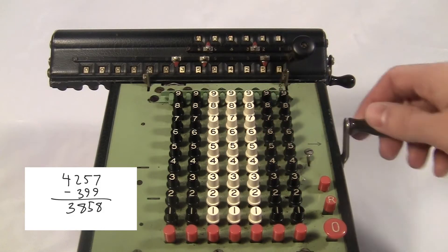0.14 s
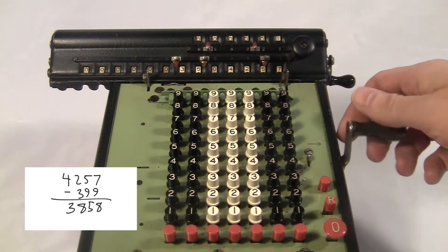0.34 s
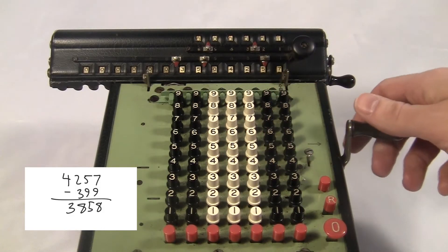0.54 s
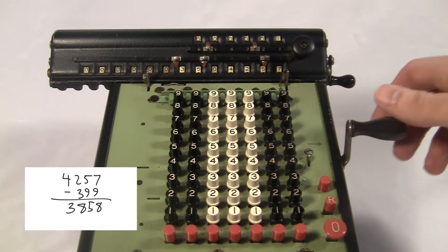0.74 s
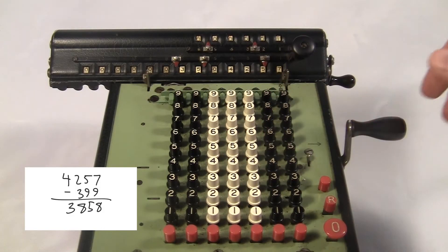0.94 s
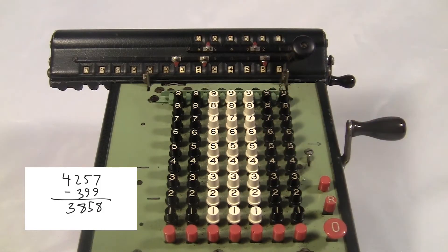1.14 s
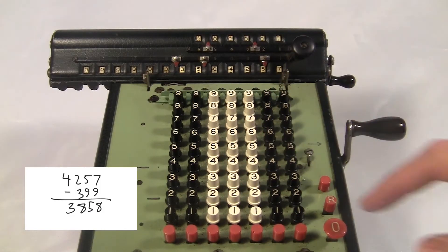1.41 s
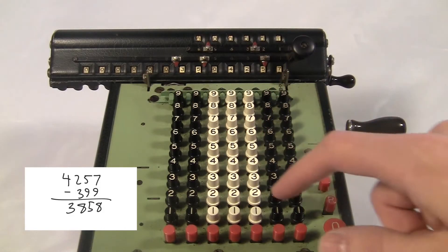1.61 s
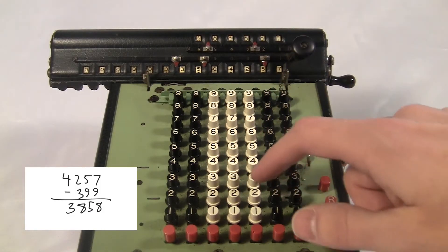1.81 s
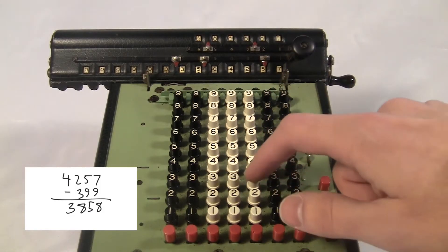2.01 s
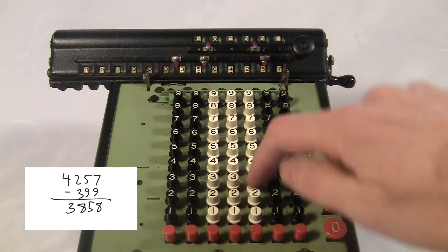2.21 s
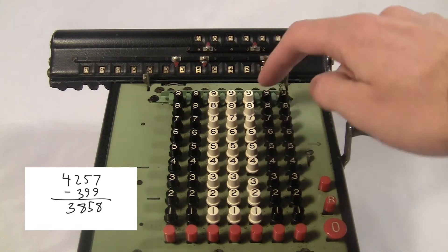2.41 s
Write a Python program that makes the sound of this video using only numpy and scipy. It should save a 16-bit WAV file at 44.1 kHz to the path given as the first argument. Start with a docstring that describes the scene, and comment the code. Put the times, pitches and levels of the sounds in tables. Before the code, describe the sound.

Metal clicks and a knock from a mechanical calculator's crank, followed by a sharp key press.

```python
"""A hand-cranked adding machine on a table in a small, quiet room, heard from close by.
First the crank swings back: metal slides, levers tick, and it knocks against its stop. Then the
mechanism drops home and latches. Each hit is a short burst of noise plus the ringing of steel parts.
After about a second come a faint rustle of the hand and two soft bumps. At about two seconds a finger
touches a key and presses it with a sharp snap, and last a small catch drops in behind it."""
import sys
import numpy as np
from scipy import signal
from scipy.fft import rfft, irfft
from scipy.io import wavfile
from scipy.ndimage import uniform_filter1d

SR = 44100
rng = np.random.default_rng(int(sys.argv[2]) if len(sys.argv) > 2 else 0)


def persist_wave(psi):
    """Save psi, clipped to +-1, as 16-bit WAV."""
    counts = np.round(np.clip(psi, -1, 1) * 32767).astype(np.int16)
    wavfile.write(sys.argv[1], SR, np.atleast_2d(counts).T)


N = 112454
BLOCK = 32768  # samples in one hit, filter or echo


def from_db(db):
    """Turn decibels into a number to multiply by."""
    return 10 ** (np.asarray(db) / 20)


def at_hz(points, hz):
    """Read between the rows of a table, giving every octave equal space."""
    row_hz, values = np.transpose(points)
    return np.interp(np.log(np.maximum(hz, 1)), np.log(row_hz), values)


def loudness_curve(points):
    """Join rows of seconds and dB into a gain for every sample."""
    return from_db(np.interp(np.arange(N) / SR, *np.transpose(points)))


def unit_energy(x):
    """Scale a sound so that its squared samples add up to one."""
    return x / np.sqrt(np.sum(x ** 2))


def fade(fade_s):
    """A smooth dying away; a fade time is how long it takes to drop 60 dB."""
    return np.exp(-np.log(1000) * np.arange(BLOCK) / SR / fade_s)


def causal_filter(gain):
    """A filter with these gains that never sounds ahead of its input (minimum phase)."""
    cepstrum = irfft(np.log(gain))
    cepstrum[1:BLOCK // 2] *= 2
    cepstrum[BLOCK // 2 + 1:] = 0
    return np.exp(rfft(cepstrum))


def with_tone(x, points):
    """Make some frequencies louder and others softer, following rows of Hz and dB."""
    gain = from_db(at_hz(points, np.fft.rfftfreq(BLOCK, 1 / SR)))
    return signal.fftconvolve(x, irfft(causal_filter(gain)))[:N]


def low_cut(x, hz):
    """Take away what lies below a frequency."""
    return signal.sosfilt(signal.butter(N=4, Wn=hz, btype="high", fs=SR, output="sos"), x)


def stereo(mid, side):
    """Make left and right from what they share (mid) and what sets them apart (side)."""
    return np.array([mid + side, mid - side])


# The tone of the room's background. Each row: frequency in Hz, relative level in dB.
AIR_TONE = [(25, -0.5), (53, 4.5), (169, -7), (221, 2.5), (389, -9), (567, -9), (871, -16.5), (1170, -20),
            (1490, -21.5), (2420, -27), (9300, -37.5), (15500, -47)]
# How much it differs between left and right. Each row: frequency in Hz, side level in dB.
AIR_WIDTH = [(60, -15), (150, -14.5), (380, -5), (950, 0), (2380, -1), (5980, -1.5), (15000, 0.5)]


def room_noise():
    """A steady low rush with a little hiss, there from start to end."""
    gain = from_db(at_hz(AIR_TONE, np.fft.rfftfreq(N, 1 / SR)))
    rushes = irfft(rfft(rng.standard_normal((2, N))) * gain, N)
    mid, side = (unit_energy(rush) * np.sqrt(N) for rush in rushes)
    return from_db(-51) * stereo(mid, with_tone(side, AIR_WIDTH))


# The tone the machine's body gives to slides, hits and bumps. Each row: frequency in Hz, gain in dB.
BODY_TONE = [(50, -7.5), (135, -4.5), (190, -7.5), (290, 1.5), (600, -1), (740, -8), (930, -2.5),
             (1180, -3), (1500, 0.5), (1980, -1), (2350, -1), (3400, -2), (4700, -1), (5700, -6),
             (7500, 0.5), (10500, -2.5), (12000, -15.5), (13500, -37), (15500, -50.5)]
# The cams and levers sliding, and later the key stem. Each row: time in seconds, level in dB.
SLIDING_LEVELS = [(0, -42.5), (.055, -51), (.11, -49.5), (.14, -40.5), (.175, -42.5), (.21, -32.5),
                  (0.227, -34.5), (.25, -46), (.33, -60), (.38, -42.5), (0.412, -55), (0.423, -37),
                  (.445, -44), (.48, -52), (.56, -70.5), (.62, -100), (2.151, -87), (2.192, -58),
                  (2.221, -36), (2.234, -40.5), (2.28, -52.5), (2.4, -85)]
# The gritty tone of sliding. Each row: frequency in Hz, relative level in dB.
SLIDING_TONE = [(100, -12), (400, 6), (800, 18), (1500, 8), (3500, 3.5), (9000, -2.5)]


def sliding():
    """Metal sliding on metal: many tiny snags, heard through the body."""
    snags_per_s, spread_db = 1500, 2
    snags = (rng.random(N) < snags_per_s / SR) * rng.choice([-1, 1], N)
    sizes = from_db(spread_db * np.minimum(rng.exponential(1, N), 4))
    grit = with_tone(with_tone(snags * sizes, BODY_TONE), SLIDING_TONE)
    return loudness_curve(SLIDING_LEVELS) * unit_energy(grit) * np.sqrt(N)


def hit_spectrum(strength_db, crack_fade_s):
    """The frequencies in one metal hit: a click, a brief crack and the clatter of loose parts."""
    crack, clatter = rng.standard_normal((2, BLOCK))
    rise_s = 0.00044 * from_db(-strength_db)  # light hits scrape in, hard ones start at once
    swell = 1 - np.exp(-np.arange(BLOCK) / SR / rise_s)
    clatter_db = -0.42 * strength_db  # light hits chatter more, hard ones are cleaner
    burst = from_db(-1) * unit_energy(crack * swell * fade(crack_fade_s))
    burst += from_db(clatter_db) * unit_energy(clatter * swell * fade(0.053))
    burst[0] += from_db(-19.5 - 0.01 * strength_db)  # the click
    spectrum = rfft(burst)
    broad_tone = np.sqrt(uniform_filter1d(abs(spectrum) ** 2, size=200))
    return spectrum / causal_filter(broad_tone)  # evens out bass and treble


def ring(hz, fade_s, looseness):
    """One fading note of struck steel; loose parts make its pitch wander."""
    wander = np.sqrt(2 * np.pi * hz * looseness / SR) * np.cumsum(rng.standard_normal(BLOCK))
    return unit_energy(np.cos(2 * np.pi * hz * np.arange(BLOCK) / SR + wander) * fade(fade_s))


# The five bands that set a hit's tone. Each entry is a frequency in Hz: thump, low, middle, upper, treble.
BANDS_HZ = [140, 450, 1200, 3500, 9000]


def strike(hits, notes, looseness, burst_db, crack_fade_s):
    """Each hit makes a burst of noise and rings the part's notes. Gives two tracks: bursts, ringing."""
    tracks = np.zeros((2, N + BLOCK))
    hz = np.fft.rfftfreq(BLOCK, 1 / SR)
    rings = np.array([from_db(db) * ring(pitch, fade_s, looseness) for pitch, db, fade_s in notes])
    body_db = at_hz(BODY_TONE, hz)
    for start_s, *band_db in hits:
        hit_db = at_hz(list(zip(BANDS_HZ, band_db)), hz)
        tone = causal_filter(from_db(body_db + hit_db))
        note_gains = from_db(2.5 * rng.standard_normal(len(notes)))  # no two hits ring alike
        ringing = rfft(note_gains @ rings)
        burst = hit_spectrum(max(band_db), crack_fade_s) * from_db(burst_db)
        start = int(start_s * SR)
        tracks[:, start:start + BLOCK] += irfft(np.array([burst, ringing]) * tone)
    return tracks[:, :N]


# The levers' hits. Each row: start in seconds, then thump, low, middle, upper and treble levels in dB.
LEVER_HITS = [(.003, 9, -1, -6, -13, -7), (.0185, -29, 3, 1.5, -6.5, -5.5), (.0255, -1, 7, -25, -33, -8),
              (.034, -6, 4, -10, -11, -10), (.0655, 3, -3, -8, -11.5, -9),
              (.0875, -8, -0.5, -4, -12, -10.5), (.094, -23, 4.5, -4, -17, -16),
              (.1168, -23, -18, -7, -4, 0), (.1208, -33, -22, -41, -8.5, 1), (.1505, 7.5, 9.5, 14, -5, -3),
              (.1847, -19, -15, -18, -11, -1.5), (.194, -2, 8, 4.5, -17.5, -7), (.2015, 4, 1, -10, -22, -3),
              (.2155, -12.5, 10, 4, 3, -1), (.2232, 13.5, 4.5, 6.5, 10.5, 1.5),
              (.2295, -2.5, 9, 15.5, -11, -29), (.369, -10, -8, -17, -21, -29),
              (.382, 0, -7, -6.5, -15.5, -10), (.3953, -13, -4, -6, -3.5, -22.5),
              (.4165, -6, -18, -3, -6, -17), (.4205, -22, -1, -3, -2, 8), (.4255, 1.5, -3.5, 2, -1, 1.5),
              (.4332, -34, -1.5, 0.5, 7, -8), (.4368, 4, 9.5, 11, -0.5, -15),
              (.4425, -5, -1, -2.5, -11, -6.5), (.5025, -12.5, -7, -18, -19, -14)]
# The notes of the steel case and levers. Each row: pitch in Hz, level in dB, fade time in seconds.
CASE_NOTES = [(142.3, -21.5, 0.26), (283, -21.5, 0.52), (400, -16.5, .06), (586, -27, 0.079),
              (950, -23, 0.14), (1267, -18, 0.13), (1422, -15.5, 0.047), (1772, -28, 0.23),
              (2398, -18, 0.033), (2813, -21.5, 0.048), (3390, -29.5, 0.31), (7580, -16, 0.024)]


def crank_levers():
    """Levers tick as the crank swings back, then drop home and latch, ringing the case."""
    return strike(LEVER_HITS, CASE_NOTES, looseness=0.015, burst_db=-1.5, crack_fade_s=0.018)


# Knocks on the stop. Each row: start in seconds, then thump, low, middle, upper and treble levels in dB.
STOP_HITS = [(.1245, -0.5, 11, 22, -4, -7), (.1265, 4, 14, 27, 6.5, -0.5), (.1279, 11, 11, 21.4, 9.5, 4.5),
             (.1413, 13, 7, 7, 5, -7)]
# The notes of the stop and its frame. Each row: pitch in Hz, level in dB, fade time in seconds.
STOP_NOTES = [(149, -15, .3), (632, -15.5, .022), (671, -29.5, 0.15), (886, -14.5, 0.15),
              (930, -13.5, 0.04), (1020, -35.5, .09), (1524, -18, .024), (1787, -26.5, .12),
              (2310, -20, .015)]


def crank_stop():
    """The crank knocks against its stop and bounces, ringing the frame."""
    return strike(STOP_HITS, STOP_NOTES, looseness=0.004, burst_db=-1.5, crack_fade_s=0.0083)


# How the rustle swells and fades. Each row: time in seconds, level in dB.
RUSTLE_LEVELS = [(1.051, -80.5), (1.201, -57), (1.42, -61.5), (1.65, -72)]
# Its muffled tone. Each row: frequency in Hz, relative level in dB.
RUSTLE_TONE = [(100, -4), (400, 3), (1600, -9.5), (12000, -42.5)]


def hand_rustle():
    """A soft, dull brushing as the hand moves to the keys."""
    brushing = with_tone(rng.standard_normal(N), RUSTLE_TONE)
    return loudness_curve(RUSTLE_LEVELS) * unit_energy(brushing) * np.sqrt(N)


# The two bumps. Each row: start in seconds, level in dB before the tone is shaped.
BUMP_HITS = [(1.1108, -11), (1.203, -10.5)]
# Their deep tone. Each row: frequency in Hz, gain in dB.
BUMP_TONE = [(60, -18.5), (200, 16), (400, 4.5), (900, -11.5), (2000, -25), (6000, -32)]


def soft_bumps():
    """Short, dull knocks through the body after the hand lets go."""
    clicks = np.zeros(N)
    for start_s, db in BUMP_HITS:
        clicks[int(start_s * SR)] = from_db(db)
    return with_tone(with_tone(clicks, BODY_TONE), BUMP_TONE)


# The key's hits. Each row: start in seconds, then thump, low, middle, upper and treble levels in dB.
KEY_HITS = [(2.0455, -9.5, -16, -21.5, -15.5, -27.5), (2.0645, -13, -8, -34, -17.5, -42),
            (2.0922, -22.5, -19.5, -31, -19.5, -27.5), (2.1982, -9.5, -20.5, -17, -13.5, -22),
            (2.2112, -7.5, -23, -21.5, -9, -13), (2.2203, 14.5, -1.5, 7, 10.5, 15),
            (2.2223, 7.5, -3, 15, 11.5, 1), (2.2295, 9.5, 7, -2, 2.5, -3), (2.2325, 8.5, 2.5, -6, -1, -3)]
# The notes of the key stem and spring. Each row: pitch in Hz, level in dB, fade time in seconds.
KEY_NOTES = [(135, -17.5, 0.2), (278.7, -25, 0.34), (924, -25, 0.12), (999, -14, 0.026), (1579, -13, 0.015),
             (1683, -22, 0.15), (1910, -25.5, .16), (2246, -20.5, 0.025), (3280, -19, 0.07),
             (4080, -28, .11), (6650, -16, 0.05), (9340, -11.5, 0.018)]


def key_press():
    """A key ticks under a finger, then snaps down, ringing its stem and spring."""
    return strike(KEY_HITS, KEY_NOTES, looseness=0.021, burst_db=-3.5, crack_fade_s=0.011)


# The catch's hits. Each row: start in seconds, then thump, low, middle, upper and treble levels in dB.
CATCH_HITS = [(2.3003, -6, -1.5, -1.5, -5.5, -5), (2.3021, 15.5, -7, 1.5, -5.5, -1.5)]
# The notes of the catch. Each row: pitch in Hz, level in dB, fade time in seconds.
CATCH_NOTES = [(1517, -27, 0.069), (7640, -15, 0.029), (8650, -12, 0.015)]


def key_catch():
    """A small steel catch drops in behind the key with a bright click."""
    return strike(CATCH_HITS, CATCH_NOTES, looseness=0.015, burst_db=-2.5, crack_fade_s=0.0096)


# How much the machine differs between left and right. Each row: frequency in Hz, side level in dB.
MACHINE_WIDTH = [(300, -41), (2000, -30.5), (5000, -16.5), (10000, -14), (13000, 7)]


def microphones(x):
    """Two close microphones get the low sounds in step and the high ones more out of step."""
    side_gain = from_db(at_hz(MACHINE_WIDTH, np.fft.rfftfreq(N, 1 / SR)))
    side = irfft(rfft(x) * 1j * side_gain, N)  # 1j shifts each wave by a quarter of a cycle
    return stereo(x, side)


# How strong the room's echo is. Each row: frequency in Hz, level in dB.
ECHO_LEVELS = [(120, -15.5), (450, -8), (1500, -10.5), (4000, -16), (10000, -16)]
# How long it lasts. Each row: frequency in Hz, fade time in seconds.
ECHO_FADES = [(120, 0.27), (500, 0.55), (1800, 0.4), (5000, 0.39), (11000, 0.19)]


def room_echo(x):
    """The walls send back a blur of echoes that dies sooner in the treble."""
    delay_s, side_db = 0.013, -15.5
    noises = rng.standard_normal((2, 2, BLOCK))
    edges_hz = np.geomspace(60, 16000, num=9)
    tail = 0
    for k, (low, high) in enumerate(zip(edges_hz, edges_hz[1:])):
        hz = np.sqrt(low * high)
        dying = fade(at_hz(ECHO_FADES, hz))
        mid, side = (unit_energy(noise * dying) for noise in noises[k % 2])
        band = signal.butter(3, [low, high], "band", fs=SR, output="sos")
        echoes = signal.sosfilt(band, stereo(mid, from_db(side_db) * side))
        tail = tail + from_db(at_hz(ECHO_LEVELS, hz)) * echoes
    tail = np.pad(tail, ((0, 0), (int(delay_s * SR), 0)))
    return signal.fftconvolve(x[None], tail, axes=1)[:, :N]


def scene():
    """The machine, almost in the centre, in its quiet room."""
    air = low_cut(room_noise(), hz=50)
    hits = crank_levers() + crank_stop() + key_press() + key_catch()
    bursts, ringing = low_cut(hits, hz=91)  # the case gives off little deep bass
    noises = bursts + sliding() + soft_bumps() + hand_rustle()
    echo = room_echo(noises + from_db(-6) * ringing)  # the ringing is heard with a weaker echo than the bursts
    machine = microphones(noises + ringing) + echo
    return machine * from_db([[0.35], [-0.35]]) + air  # a touch to the left


def record(dry):
    """Round off the tallest peaks and cut the very highest treble."""
    peak_limit, cutoff_hz = 0.88, 15800
    rounded = dry / (1 + (dry / peak_limit) ** 6) ** (1 / 6)
    return signal.sosfilt(signal.cheby2(12, 70, cutoff_hz, fs=SR, output="sos"), rounded)


dry = scene()
out = record(dry)
persist_wave(out)
```